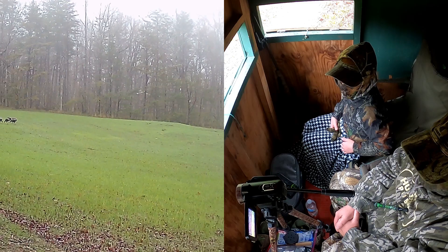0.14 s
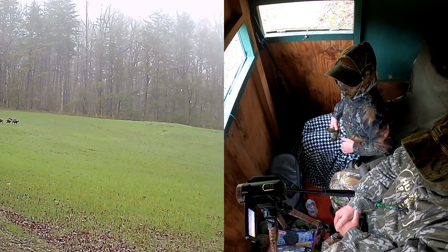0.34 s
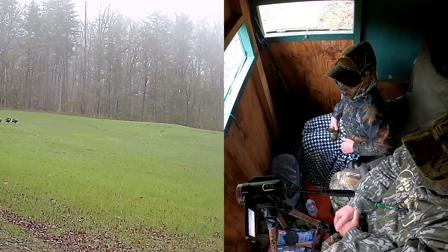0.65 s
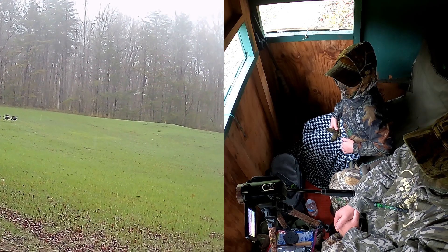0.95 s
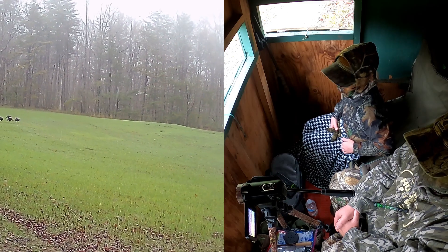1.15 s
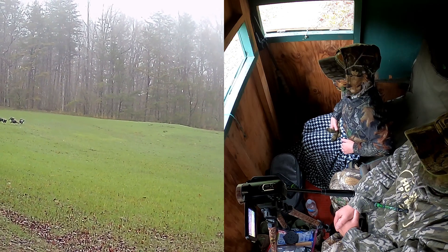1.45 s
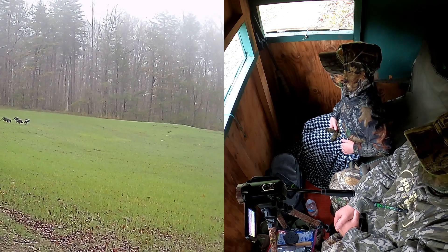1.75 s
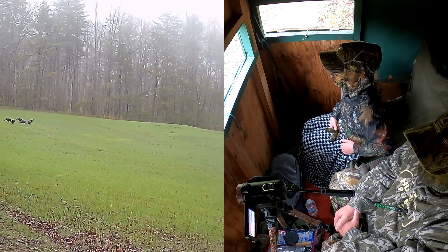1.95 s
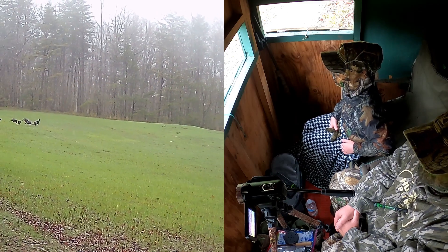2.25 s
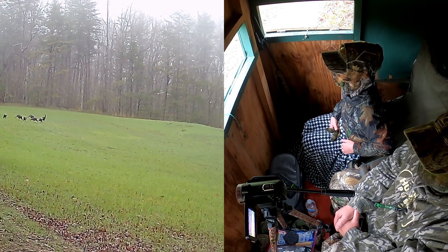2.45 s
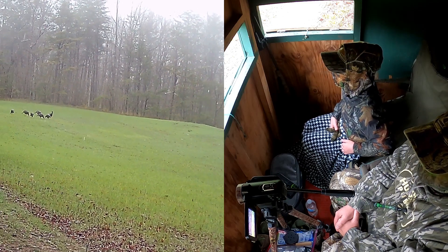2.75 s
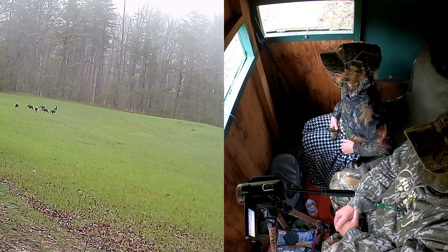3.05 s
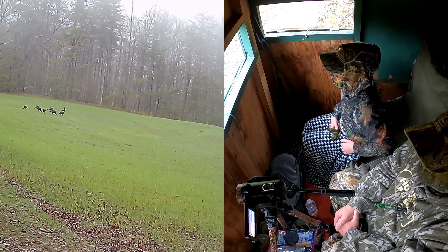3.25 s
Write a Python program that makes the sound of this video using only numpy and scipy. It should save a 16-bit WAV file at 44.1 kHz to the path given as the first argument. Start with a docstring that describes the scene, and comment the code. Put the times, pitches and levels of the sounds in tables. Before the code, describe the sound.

Raindrops tap unevenly on a small wooden blind's roof, sharp clicks with low woody ringing, over faint rain hiss and rumble. A hoarse distant call comes first; a far bird whistles thinly after two seconds. Stereo, heard from inside.

```python
"""Light rain heard from inside a small wooden hunting blind. Throughout, filtered noise makes a faint rumble
of air and the hiss of rain on the field, and many tiny random ticks patter on the roof. A hoarse far call
of three blurred tones comes first. Then larger drops tap irregularly until the end: each is a click with
a short noisy rattle, while decaying sine waves let the boards and cabin ring low. After two seconds a far
bird gives two thin, gliding whistles; like the call, they trail a short echo from the trees."""
import sys
import numpy as np
from scipy import signal
from scipy.fft import rfft, irfft, next_fast_len
from scipy.io import wavfile
from scipy.ndimage import uniform_filter1d

SR = 44100
rng = np.random.default_rng(int(sys.argv[2]) if len(sys.argv) > 2 else 0)


def unload_wav(signal):
    """Save mono or channel-first audio to the path in sys.argv[1] as 16-bit WAV at rate SR, clipped to [-1, 1]."""
    wavfile.write(
        sys.argv[1],
        SR,
        np.round(np.clip(np.atleast_2d(signal).T, -1, 1) * 32767).astype(np.int16),
    )


N = 147735

# Rumble of air, its colour: f/Hz, relative level per Hz/dB
RUMBLE_COLOUR = [(10, -23.5), (22, -3.5), (32, 7), (50, 4), (68, -11.5), (110, -21), (200, -36.5),
                 (600, -71)]
# Rumble of air, its rise and fall: t/s, level/dB
RUMBLE_LEVEL = [(0, -55.5), (.85, -61.5), (1.55, -54.5), (1.73, -48.5), (1.88, -69), (1.99, -51),
                (2.8, -53), (3.35, -62.5)]
# Rain on the field, its colour: f/Hz, relative level per Hz/dB
HISS_COLOUR = [(100, -6.5), (178, -7.5), (254, -12), (480, -21), (620, -24), (800, -35), (1070, -18),
               (1410, -15.5), (1900, -19), (3620, -19.5), (5200, -22.5), (7630, -27.5), (10000, -38.5),
               (12500, -43), (14800, -58.5)]
# Rain on the field, left against right: f/Hz, lean to the left/dB
HISS_LEAN = [(200, -1.5), (700, -4), (2300, 6.5), (4300, 2), (8000, 0), (13000, -2)]
# How alike left and right are for sounds outside: f/Hz, correlation/1
FIELD_LIKENESS = [(30, 0.77), (110, 0), (350, 0.69), (1300, 0.68), (2500, 0.51), (4500, 0.31), (8000, 0),
                  (14000, 0)]
# How alike left and right are for sounds in the cabin: f/Hz, correlation/1
CABIN_LIKENESS = [(100, 0.82), (1000, 0.67), (2500, 0.58), (5000, 0.035), (10000, 0.37)]
# Tones of the far call: f/Hz, level before flutter and echo/dB
CALL_TONES = [(535, -65), (1640, -69), (2760, -66)]
# Whistles of the far bird: start t/s, length t/s, first f/Hz, middle f/Hz, last f/Hz,
# level before flutter and echo/dB
WHISTLES = [(2.003, .3, 3710, 3780, 3730, -68), (2.556, .085, 3950, 3810, 3600, -67)]
# Colour of the fine patter: f/Hz, relative level/dB
PATTER_COLOUR = [(300, -10.5), (750, 1.5), (1400, -9.5), (3000, 0), (5000, -7.5), (7500, -5),
                 (10000, -12.5), (12500, -27), (15000, -29)]
# Colour shared by all taps: f/Hz, relative level/dB
TAP_COLOUR = [(100, -4.5), (290, -6.5), (460, -0.5), (680, -18.5), (1000, -0.5), (1450, 0.5), (2200, -0.5),
              (3500, 1), (5200, -0.5), (7500, -9.5), (10000, -26.5), (12500, -49), (15000, -50)]
# Typical delays of the echoes off the nearest walls: t/s
ECHO_DELAYS = [0.0016, .0032]
# Ringing of roof and cabin: f/Hz, relative level/dB, time to fall by 60 dB t/s
RING_MODES = [(80.8, -7.5, 0.13), (113.1, -6, 0.19), (149.7, -5.5, 0.16), (176.1, -4.5, 0.23),
              (209.7, -5, .15), (257.2, -9, 0.13), (307.7, -7.5, 0.14), (362.7, -8, 0.098),
              (432.2, -8.5, .13), (468, -8, 0.15), (509, -10.5, 0.11), (569, -19, .15), (716.5, -18, 0.13),
              (842, -19, 0.079), (1175, -14.5, 0.11)]
# Drops on the roof, levels before the shared trims: start t/s, tap level/dB, thump level/dB, boom level/dB,
# knock level/dB, tick level/dB, lean of the tap to the left/dB, struck spot f/Hz, its panel f/Hz,
# swell of the ring/cycles, rattle's time to fall by 60 dB t/s
DROPS = [(0.2444, -50.5, -74, -70, -63, -66, 9, 2050, 260, 1.2, 0.046),
         (0.3036, -33, -45, -48, -40.5, -62, 8, 1180, 338, 2.3, 0.067),
         (0.4332, -59, -78, -75, -58, -63, 6, 3200, 300, 1.2, .05),
         (0.4471, -28, -34.5, -35, -38.5, -48.5, 14, 1460, 220, 0.89, 0.061),
         (0.4937, -57, -46, -70, -72, -55.5, 0, 4600, 80, 1.2, 0.033),
         (0.5552, -84, -73, -84, -73, -55, 3, 3900, 180, 1, 0.042),
         (0.597, -49, -67, -55.5, -59.5, -86, 1, 1110, 318, 2.4, 0.046),
         (0.6559, -48, -75, -63, -64, -66, 3, 1730, 300, 1.1, 0.051),
         (0.6732, -51, -67, -63, -75, -52, 7, 2430, 180, 0.89, .11),
         (0.7945, -48, -79, -54, -63, -58, 1, 1280, 175, 4.1, 0.056),
         (0.947, -39, -45, -48.5, -51.5, -65.5, 4.5, 1220, 255, 2.7, 0.077),
         (0.9794, -45, -65, -63, -58.5, -53, 4, 2660, 310, 1.7, 0.084),
         (1.1046, -50, -71, -65, -64, -63, 2, 2030, 200, 1.2, 0.04),
         (1.212, -56, -54, -49.5, -74, -71, 2, 1400, 152, 2.1, 0.065),
         (1.253, -50, -47.5, -56, -58, -79, -1, 1197, 435, 2.5, 0.13),
         (1.2903, -35.5, -44.5, -44, -48, -49, 3.5, 1743, 196, 2, 0.12),
         (1.3353, -46.5, -50, -48.5, -51.5, -81, 6, 1100, 238, 1.8, 0.095),
         (1.3576, -49, -53.5, -49, -60.5, -61, 4, 2320, 115, 4.5, 0.11),
         (1.4189, -57, -53, -47.5, -52.5, -72.5, 3.5, 1280, 181, 2.2, .08),
         (1.5375, -30, -39, -42.5, -39, -31.5, 4.5, 2330, 173, 4.3, 0.075),
         (1.6425, -24.5, -52, -37, -36.5, -46, 0.5, 1390, 190, 2.3, 0.077),
         (1.6931, -43.5, -43.5, -39.5, -50.5, -72, 4, 1300, 270, 0.65, .08),
         (1.7846, -36, -58, -43, -43.5, -47.5, 1.5, 1460, 161.8, 3.87, 0.077),
         (1.8211, -45, -73.5, -56, -77, -49.5, 6, 2260, 197, 0.83, 0.042),
         (1.8381, -45.5, -68, -66, -77, -49, 1, 7060, 200, 1.2, .1),
         (1.8723, -48, -69, -57, -61.5, -59, 4, 3670, 433, 3.7, 0.087),
         (1.918, -55, -48.5, -46, -54.5, -80, 12, 1450, 277, 3.2, .08),
         (2.2771, -53, -42.5, -70, -48.5, -62.5, 17, 1080, 113, 0.85, 0.1),
         (2.2922, -32.5, -44.5, -39, -42, -44, 9, 1860, 113, 0.98, 0.089),
         (2.349, -61, -46, -50, -62.5, -66, 5, 1250, 113, 0.6, 0.095),
         (2.4956, -48.5, -75, -57.5, -66, -59, 4, 1330, 190, 0.6, 0.08),
         (2.576, -47, -60, -57, -55, -64, 8, 1730, 216, 0.73, 0.054),
         (2.61, -53.5, -62, -48, -58, -78, 4, 1300, 455, 0.61, .08),
         (2.692, -44.5, -70.5, -64, -85, -52.5, 3, 2650, 179, 1.1, 0.1),
         (2.7645, -35, -47.5, -41, -44.5, -61.5, 9, 1170, 280, 1.4, 0.045),
         (2.8448, -49.5, -50, -54, -60, -56.5, 3.5, 2680, 310, 1.1, .074),
         (2.861, -41, -54, -62, -42.5, -58.5, 5.5, 1430, 314, 2.7, 0.071),
         (2.8986, -52.5, -65, -59.5, -69, -54, 3.5, 2700, 460, 1.1, 0.095),
         (3.018, -53, -78, -86, -92, -55.5, 8, 3600, 180, 1.2, .08),
         (3.0859, -42, -71, -55.5, -70.5, -60, 0, 1470, 169, 4.3, .11),
         (3.1738, -63, -67, -55, -79, -52.5, 2, 4500, 165, 2.4, 0.32),
         (3.3047, -52, -70, -56, -64, -73, 3, 1410, 303, 1.3, .092)]

HISS_DB, HISS_FLICKER_DB = -59, 0.86
CALL_START_S, CALL_LENGTH_S = 0.033, 0.19
CALL_ARCH, CALL_WAVER = 0.028, 0.02  # shares of the pitch
WHISTLE_WAVER, WHISTLE_FLUTTER_DB = 0.014, 3.5  # waver is a share of the pitch
WOOD_ECHO_DB, WOOD_T60_S = 1.5, 0.52
PATTER_PER_S, PATTER_T60_S, PATTER_SCATTER_DB = 70, 0.066, 4.5
PATTER_DB, PATTER_RING_DB = -68.5, -71
PATTER_PITCH_HZ, PATTER_SPOT_DB = 3230, 11
# Shared trim of all taps, then the two pitches between which the treble is tilted
TAP_DB, TAP_HZ, TICK_HZ = -16, 1710, 5870
PLAIN_TICK_DB = -2  # tick minus tap level that leaves the treble untilted
CLICK_DB, ECHO_DB, RATTLE_RISE_S = -8.5, -17.5, 0.00035  # levels against crack and rattle
CRACK_DB, CRACK_T60_S = 4, 0.0043  # the struck board's own crack, against the rattle
SPOT_DB, SPOT_WIDTH = 6, 1.246  # lift at the struck spot's pitch, reach as a frequency ratio
THUMP_HZ, BOOM_HZ, KNOCK_HZ = 113.5, 174, 366  # where each drop's three low levels apply
RING_DB, RING_SCATTER_DB, RING_PAN_DB = 1, 1.5, 3.5
RING_DETUNE = 0.0095  # typical share of the pitch
# Modes near the panel's pitch ring louder and longer; width is in natural-log frequency
PANEL_DB, PANEL_WIDTH, PANEL_SUSTAIN = 6.5, 0.11, 0.072
TOP_HZ = 14900


def undb(db):
    """Turn decibels into gain."""
    return 10 ** (np.asarray(db) / 20)


def level(x, db):
    """Scale a sound so that its average (rms) strength is the given level."""
    return x * undb(db) / np.sqrt(np.mean(x ** 2))


def along(points, n):
    """Read a table of frequency and value at every bin of an n-point spectrum."""
    hz, value = np.array(points, float).T
    bins_hz = np.arange(n // 2 + 1) * SR / n
    return np.interp(np.log(bins_hz + 1), np.log(hz), value)


def colour(x, points):
    """Filter a sound to the levels in a table, without any sound ahead of its start."""
    n = x.shape[-1]
    size = 2 * next_fast_len(n)
    cepstrum = irfft(np.log(undb(along(points, size))))
    # Folding the cepstrum gives the minimum-phase filter
    cepstrum[1:size // 2] *= 2
    cepstrum[size // 2 + 1:] = 0
    response = np.exp(rfft(cepstrum))
    return irfft(rfft(x, size) * response)[..., :n]


def sides(db):
    """Left and right gains that differ by the given level; positive leans left."""
    return undb(np.array([[1], [-1]]) * db / 2)


def stereo_noise(n, likeness):
    """Left and right noise whose likeness depends on frequency, mixed from a middle and a side part."""
    c = np.clip(along(likeness, n), -1, 1)
    mid, side = rfft(rng.standard_normal((2, n)))
    middle_part = mid * np.sqrt(1 + c)
    side_part = np.array([[1], [-1]]) * side * np.sqrt(1 - c)
    return irfft((middle_part + side_part) / np.sqrt(2), n)


def walk(rate):
    """Smooth random wandering with about `rate` new targets a second and a spread near 1."""
    k = int(SR / rate)
    steps = np.repeat(rng.standard_normal(N // k + 1), k)
    smooth = uniform_filter1d(steps, k)[:N]
    return smooth / smooth.std()


def fade(t, t60):
    """Exponential decay that falls by 60 dB in t60 seconds."""
    return np.exp(-np.log(1000) * t / t60)


def add(out, x, start):
    """Mix a sound in at a time in seconds."""
    i = max(int(start * SR), 0)
    out[:, i:i + x.shape[1]] += x[:, :N - i]


def air():
    """Moving air: low noise that rises and falls unevenly, at times abruptly."""
    rumble = level(colour(stereo_noise(N, FIELD_LIKENESS), RUMBLE_COLOUR), 0)
    level_t, level_db = np.array(RUMBLE_LEVEL).T
    return rumble * undb(np.interp(np.arange(N) / SR, level_t, level_db))


def field_rain():
    """Rain on grass and trees: countless drops merge into a steady hiss with a slight flicker."""
    hiss = colour(stereo_noise(N, FIELD_LIKENESS), HISS_COLOUR)
    hiss = irfft(rfft(hiss) * sides(along(HISS_LEAN, N)), N)
    return level(hiss, HISS_DB) * undb(HISS_FLICKER_DB * walk(19))


def far_call():
    """A hoarse animal call: its pitch arches and wavers, and each tone is blurred by random swelling."""
    out = np.zeros((2, N))
    swell = np.sin(np.linspace(0, np.pi, int(CALL_LENGTH_S * SR)))
    n = len(swell)
    bend = 1 + CALL_ARCH * (swell - 1) + CALL_WAVER * walk(200)[:n]
    stretched_t = np.cumsum(bend) / SR
    voice = 0
    for hz, db in CALL_TONES:
        voice = voice + undb(db) * walk(107)[:n] * np.sin(2 * np.pi * hz * stretched_t)
    add(out, voice * swell * sides(2), CALL_START_S)
    return out


def bird():
    """Thin whistles: single gliding tones that swell and fade while pitch and level flutter."""
    out = np.zeros((2, N))
    for start, length, first_hz, middle_hz, last_hz, db in WHISTLES:
        progress = np.linspace(0, 1, int(length * SR))
        n = len(progress)
        glide_hz = np.interp(progress, [0, .5, 1], [first_hz, middle_hz, last_hz])
        hz = glide_hz * (1 + WHISTLE_WAVER * walk(170)[:n])
        flutter = undb(db + WHISTLE_FLUTTER_DB * walk(90)[:n])
        whistle = np.sin(2 * np.pi * np.cumsum(hz) / SR)
        add(out, flutter * np.sin(np.pi * progress) * whistle * sides(1.7), start)
    return out


def through_trees(x):
    """Trunks scatter a far sound into a short diffuse tail, made of fading noise."""
    t = np.arange(SR // 2) / SR
    tail = rng.standard_normal((2, len(t))) * fade(t, WOOD_T60_S)
    tail = tail / np.sqrt(np.sum(tail ** 2) / 2)
    echo = signal.fftconvolve(x, tail, axes=1)[:, :N]
    return x + undb(WOOD_ECHO_DB) * echo


def patter():
    """Tiny drops at random times: each ticks at its own pitch and pushes the roof into a low murmur."""
    n = SR // 16
    t = np.arange(n) / SR
    ticks, pushes = np.zeros((2, N)), np.zeros((2, N))
    count = 600  # more than enough to fill the scene
    starts = np.cumsum(rng.exponential(size=count)) / PATTER_PER_S
    sizes, pans = rng.standard_normal(count), rng.standard_normal(count)
    octaves = rng.uniform(-1.18, 1, count)
    rattles = stereo_noise(n * count, CABIN_LIKENESS).reshape(2, count, n)
    for k, start in enumerate(starts):
        if start < N / SR:
            gain = undb(PATTER_SCATTER_DB * min(sizes[k], 2)) * sides(2 + 3 * pans[k])
            tick = rattles[:, k] * fade(t, PATTER_T60_S)
            tick[:, 0] += undb(22.5)  # sharp click at the start
            hz = PATTER_PITCH_HZ * 2 ** octaves[k]
            tick = colour(tick, [(hz / 2, 0), (hz, PATTER_SPOT_DB), (hz * 2, 0)])
            add(ticks, gain * tick, start)
            add(pushes, gain, start)
    roof_ring = ring(-9, 0, -1.3, panel_hz=BOOM_HZ, swell_cycles=0.67)
    murmur = signal.fftconvolve(pushes, roof_ring, axes=1)[:, :N]
    return level(colour(ticks, PATTER_COLOUR), PATTER_DB) + level(murmur, PATTER_RING_DB)


def tap(tap_db, tick_db, pan_db, spot_hz, t60):
    """The impact: a click, echoes off the nearest walls and a dense rattle, coloured by the struck spot."""
    n = SR // 6
    t = np.arange(n) / SR
    noise = stereo_noise(n, CABIN_LIKENESS) * (1 - np.exp(-t / RATTLE_RISE_S))
    crack = undb(CRACK_DB) * fade(t, CRACK_T60_S) * sides(pan_db / 2)
    x = noise * (fade(t, t60) + crack)
    x = x / np.sqrt(np.sum(x ** 2) / 2)
    x[:, :1] -= undb(CLICK_DB) * sides(pan_db)
    for delay in ECHO_DELAYS:
        x[:, int(delay * rng.uniform(.6, 1.4) * SR)] += undb(ECHO_DB) * rng.choice([-1, 1])
    x = colour(x, [(spot_hz / SPOT_WIDTH, 0), (spot_hz, SPOT_DB), (spot_hz * SPOT_WIDTH, 0)])
    x = level(colour(x, TAP_COLOUR), tap_db + TAP_DB) * sides(pan_db / 2)
    # Tilt the treble: more tick makes a brighter tap
    return colour(x, [(TAP_HZ, 0), (TICK_HZ, tick_db - tap_db - PLAIN_TICK_DB)])


def ring(thump_db, boom_db, knock_db, panel_hz, swell_cycles):
    """Roof and cabin swell and ring as fading sines; the struck panel favours modes near its own pitch."""
    t = np.arange(SR // 2) / SR
    push_hz = np.log([THUMP_HZ, BOOM_HZ, KNOCK_HZ])
    out = 0
    for hz, db, t60 in RING_MODES:
        size, detune, phase = rng.standard_normal(3)
        near = np.exp(-(np.log(hz / panel_hz) / PANEL_WIDTH) ** 2)  # 1 at the panel's pitch
        push_db = np.interp(np.log(hz), push_hz, [thump_db, boom_db, knock_db]) + PANEL_DB * near
        swing = np.sin(2 * np.pi * (hz * (1 + RING_DETUNE * detune) * t + phase))
        swell_s = swell_cycles / hz
        decay = fade(np.maximum(t - swell_s, 0), t60 * (1 + PANEL_SUSTAIN * near))
        shape = np.minimum(t / swell_s, 1) * decay
        out = out + undb(db + push_db + RING_SCATTER_DB * size) * swing * shape
    return out * undb(RING_DB) * sides(RING_PAN_DB)


def roof_drops():
    """The drops that stand out: each joins a sharp tap to the low ring of the wood it strikes."""
    out = np.zeros((2, N))
    for (start, tap_db, thump_db, boom_db, knock_db, tick_db,
         pan_db, spot_hz, panel_hz, swell_cycles, t60) in DROPS:
        add(out, tap(tap_db, tick_db, pan_db, spot_hz, t60), start)
        add(out, ring(thump_db, boom_db, knock_db, panel_hz, swell_cycles), start)
    return out


def scene():
    """Air, rain and far animals outside; patter and larger drops overhead."""
    outside = air() + field_rain() + through_trees(far_call() + bird())
    return outside + patter() + roof_drops()


def record(dry):
    """Cut the highest treble with a steep low-pass filter."""
    low_pass = signal.ellip(8, .2, 70, TOP_HZ, fs=SR, output="sos")
    return signal.sosfilt(low_pass, dry)


dry = scene()
out = record(dry)
unload_wav(out)
```